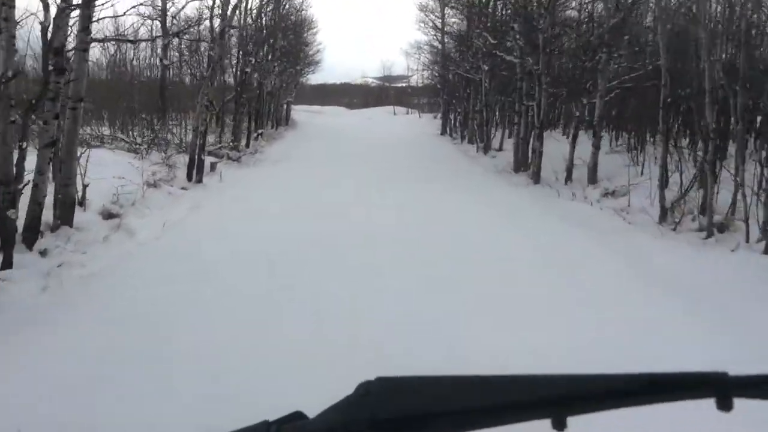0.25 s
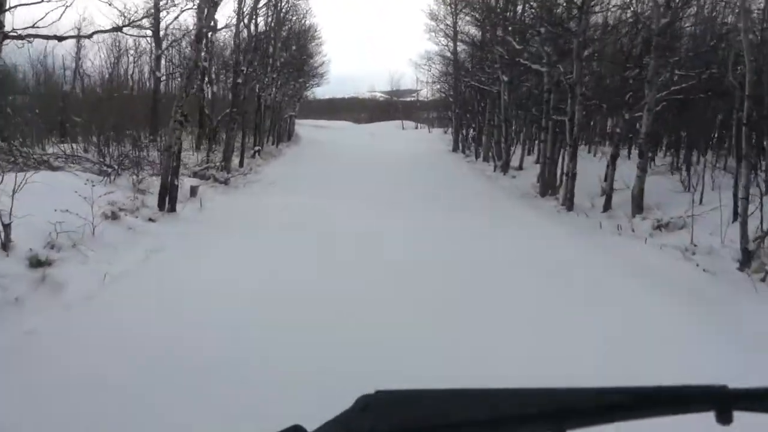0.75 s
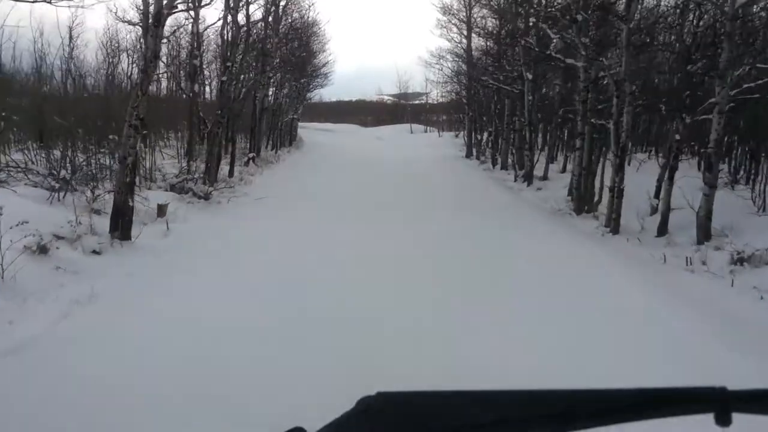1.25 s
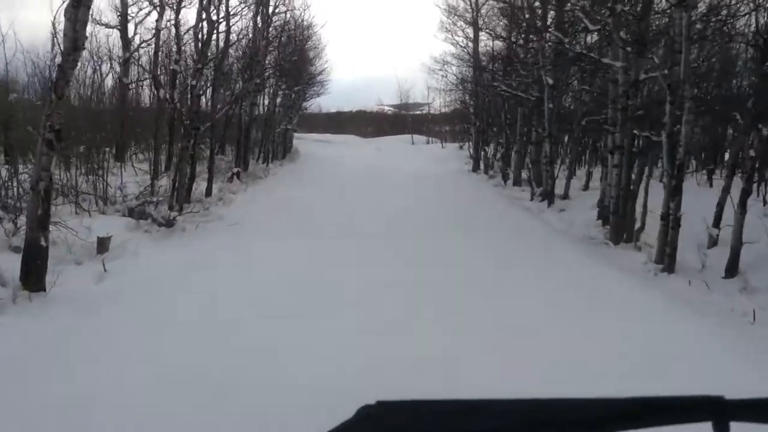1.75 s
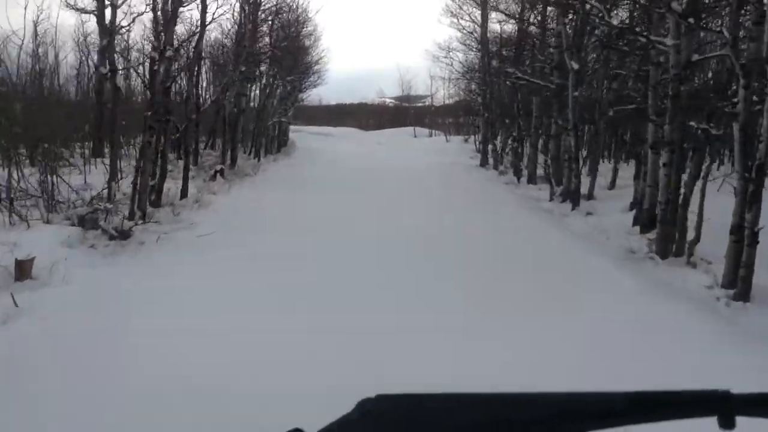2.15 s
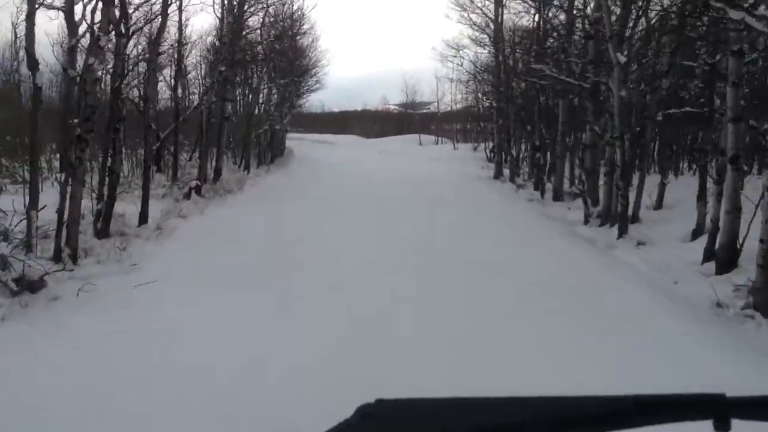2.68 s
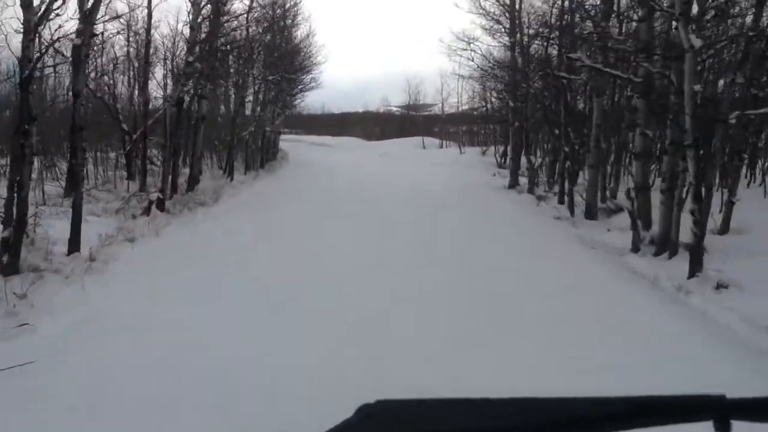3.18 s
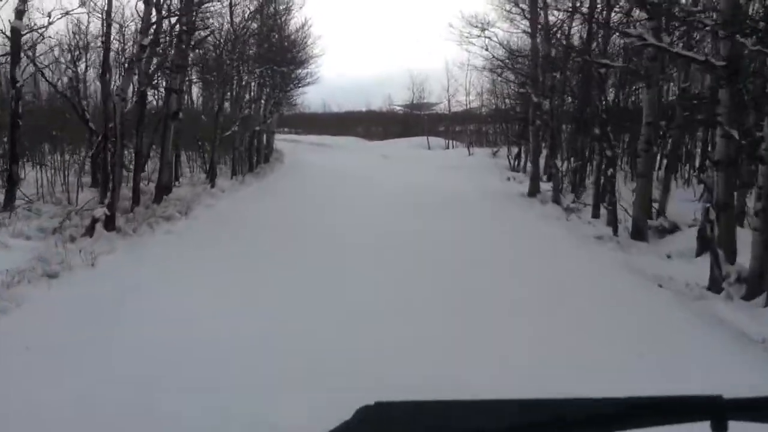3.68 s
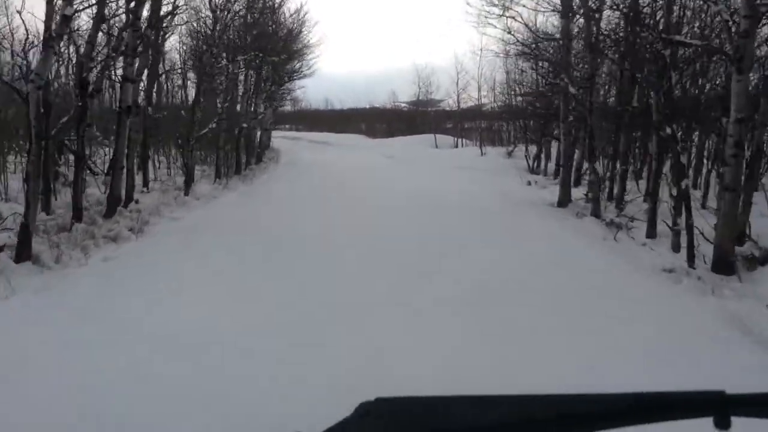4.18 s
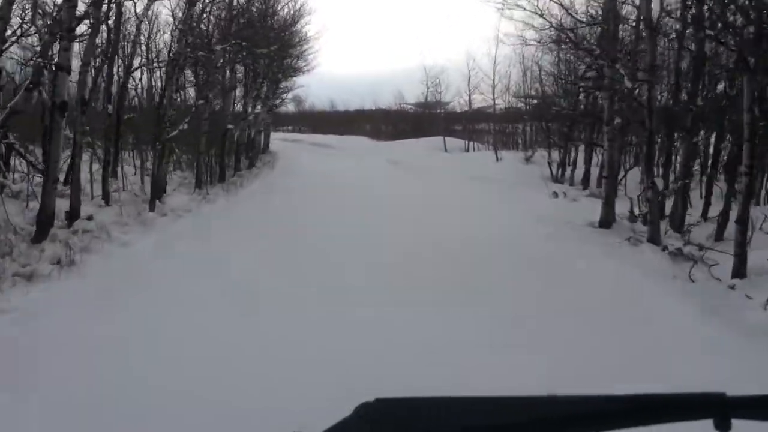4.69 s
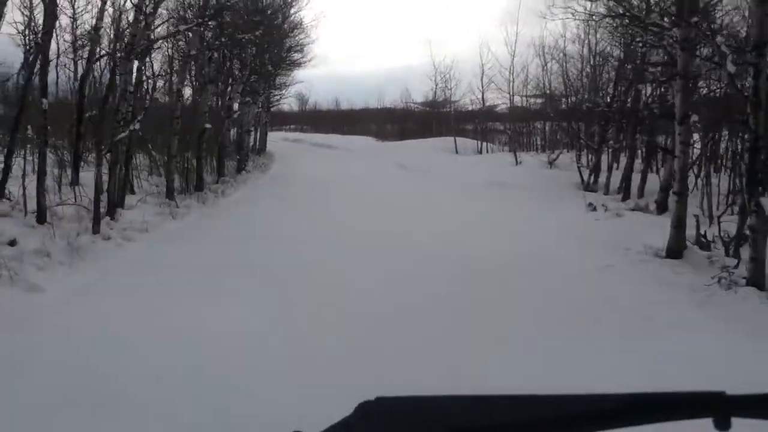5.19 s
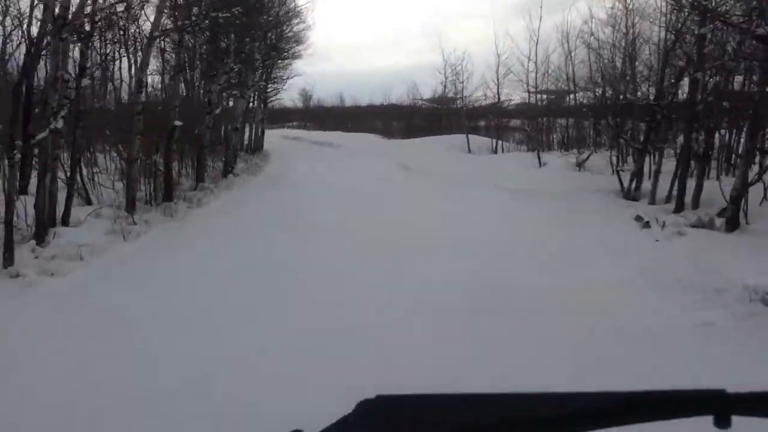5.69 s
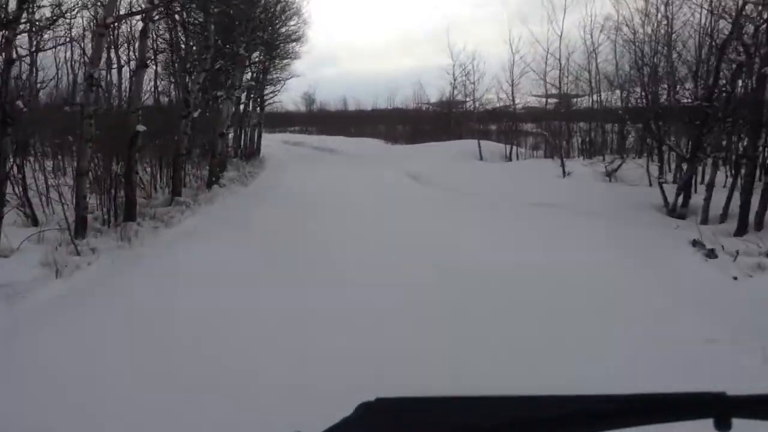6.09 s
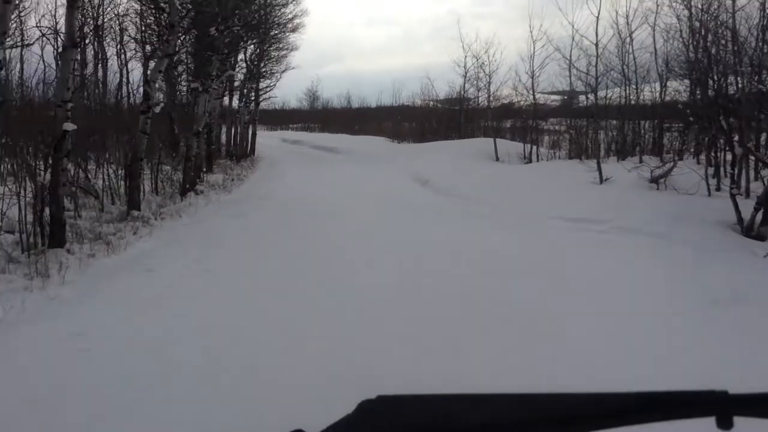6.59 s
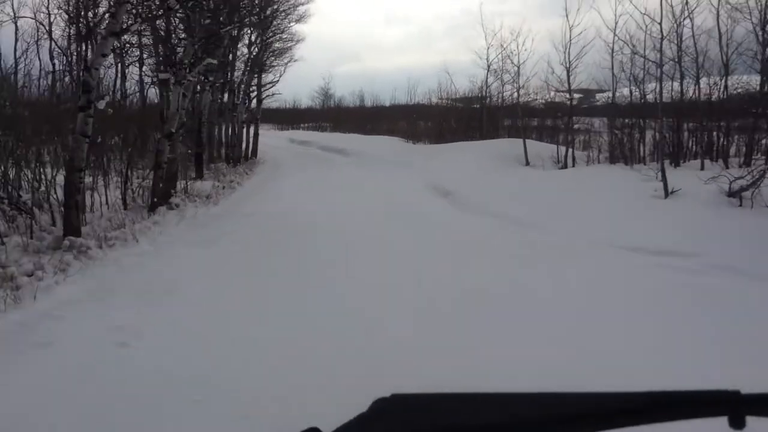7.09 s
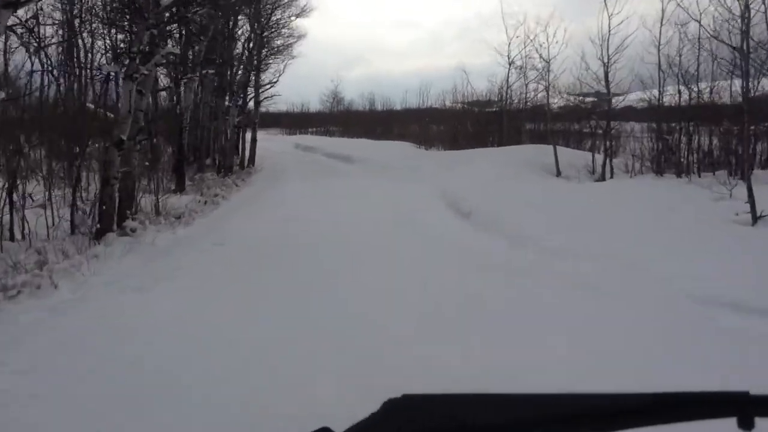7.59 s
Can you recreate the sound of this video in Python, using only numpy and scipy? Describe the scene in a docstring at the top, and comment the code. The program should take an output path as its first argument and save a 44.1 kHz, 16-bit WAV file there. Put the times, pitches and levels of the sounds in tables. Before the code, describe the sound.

A diesel truck drives slowly along a snowy track, heard from inside the cab. The engine gives a low, booming drone with a steady clatter on top. It thumps at low revs, rises slightly in pitch, then holds an even note. Underneath, the tyres rumble over humps of packed snow and loose fittings clunk lightly, mostly early on. A thin hiss and a very faint turbo whistle sit above.

```python
"""A four-cylinder diesel truck, heard from the cab, creeps along a snowy track; it gathers a little
speed, then holds it. The engine's low orders boom in the cab and its higher harmonics whine faintly.
Injectors, valves and knocks clatter in a pattern that repeats every two crank turns, and one cylinder
thumps at low revs. Underneath, the tyres rumble over humps of packed snow and loose fittings clunk
and tick. On top sit a faint turbo whistle and a thin hiss that pulses with the firings."""
import sys
import numpy as np
from scipy import signal
from scipy.fft import rfft, irfft
from scipy.io import wavfile
from scipy.ndimage import uniform_filter1d

SR = 44100
rng = np.random.default_rng(int(sys.argv[2]) if len(sys.argv) > 2 else 0)


def master(y):
    """Save y as 16-bit WAV."""
    cut = np.clip(np.atleast_2d(y).T, -1, 1)
    pcm = np.round(cut * 32767)  # scale
    wavfile.write(sys.argv[1], SR, pcm.astype(np.int16))


N = 346185
TIME = np.arange(N) / SR
FREQ = np.arange(N // 2 + 1) * SR / N + 1e-6


def undb(db):
    """Decibels to gain."""
    return 10 ** (np.asarray(db) / 20)


def unit(x):
    """Scale to rms 1."""
    return x / np.sqrt(np.mean(x ** 2))


def curves(table):
    """One automation curve for each value column of a time table."""
    times, *columns = np.transpose(table)
    return [np.interp(TIME, times, column) for column in columns]


def wander(rate_hz):
    """Smooth random modulation, rms 1."""
    return unit(irfft(rfft(rng.standard_normal(N)) * np.exp(-(FREQ / rate_hz) ** 2), N))


def colour(x, eq, resonances=()):
    """Shape a sound with an EQ curve and resonances standing on it; rms 1."""
    hz, db = np.transpose(eq)
    outline = undb(np.interp(np.log(FREQ), np.log(hz), db))
    rings = sum(undb(peak_db) / (1 + 2j * (FREQ - f) / width) for f, width, peak_db in resonances)
    return unit(irfft(rfft(x) * outline * (1 + rings), N))


def ring(hz, decay_s):
    """A struck part's muffled tone: it swells to a peak, then dies away."""
    age = TIME[:SR // 20]
    return np.sin(2 * np.pi * hz * age) * age / decay_s * np.exp(1 - age / decay_s)


def burst(decay_s):
    """The dense, short ring of a struck casting."""
    age = TIME[:SR // 20]
    return rng.standard_normal(len(age)) * np.exp(-age / decay_s)


def strikes(turns, angle, hit, scatter_db, jitter_s):
    """One hit per two-turn cycle at a crank angle (in turns), never quite alike in time or force."""
    starts = 2 * np.arange(int(turns[-1] / 2) + 1)
    late, force = rng.standard_normal((SR // 100, 2))[:len(starts)].T
    due_s = np.interp(starts + angle, turns, TIME, right=2 * TIME[-1])
    at = np.round((due_s + jitter_s * late) * SR).astype(int)
    inside = (at >= 0) & (at < N)
    blows = np.zeros(N)
    blows[at[inside]] = undb(scatter_db * force[inside])
    return signal.oaconvolve(blows, hit)[:N]


def firing_pulse(turns, depth):
    """A tremolo that swells with each injection, twice per crank turn."""
    return 1 - depth * np.cos(2 * np.pi * 2 * turns)


def orders(table, crank_hz, turns, waver, waver_hz, mount_turns=.955, exhaust_turns=1.27):
    """Tones driven by the crank, each swelling as the speed brings it onto a cab resonance."""
    out = 0
    for order, db, resonant_hz, width_hz in table:
        order = np.round(2 * order) / 2  # lock to the two-turn cycle
        # half orders arrive down the exhaust, whole ones through the mounts, which smear each firing
        arrival, smear = (exhaust_turns, 0) if order % 1 else (mount_turns, .22)
        phase = 2 * np.pi * order * (turns - arrival) - smear * order ** 2
        swell = 1 / np.hypot(1, (crank_hz - resonant_hz) / width_hz)
        level = undb(db) * swell * (1 + waver * wander(waver_hz))
        out = out + np.sqrt(2) * level * np.sin(phase)
    return out


def turbo():
    """The turbo's faint, breathy whistle drifts up in pitch, then sinks."""
    # path of the whistle: (time [s], pitch [Hz], level [dB])
    whistle = [(0, 7000, -72), (1, 7140, -74), (1.4, 7400, -78), (2.1, 7430, -71), (3.6, 7440, -74),
               (4.6, 7140, -75), (6.5, 6970, -74), (7.2, 6830, -72), (7.85, 6750, -69)]
    hz, db = curves(whistle)
    return np.sin(2 * np.pi * np.cumsum(hz) / SR) * wander(160) * undb(db)


def hiss(turns, crank_hz, brighten_per_hz=.034):
    """Thin, grainy engine-bay hiss that pulses with the firings and brightens with the revs."""
    # tone of the hiss: (frequency [Hz], gain [dB])
    hiss_eq = [(1500, -28), (3400, 9), (4200, 2), (5100, -1), (5600, 0), (6200, -2), (7100, 0), (8500, -4),
               (10200, -3.5), (10750, 0), (11300, -3.5), (12500, -4), (14500, -8), (15700, -7.5)]
    air = colour(rng.standard_normal(N) * undb(.8 * wander(1500)), hiss_eq)
    top = irfft(rfft(air) * np.clip((FREQ - 8000) / 3000, 0, 1), N)
    # the very top pulses most deeply, and differs from one cylinder to the next
    uneven = .1 * np.cos(np.pi * turns) + .1 * np.cos(2 * np.pi * turns)
    brighten = brighten_per_hz * (crank_hz - np.mean(crank_hz))
    air = air + top * (firing_pulse(turns, depth=.17) - 1 + uneven + brighten)
    flicker_db = .4 * wander(50) + .25 * wander(8)
    return air * firing_pulse(turns, depth=.15) * undb(flicker_db)


def ticks(decay_s=.0012, tail_s=.025, tail_db=-17, low_cut_hz=11000):
    """Something loose in the cab gives two tiny bright ticks, each with a faint tail."""
    # ticks ahead of the low cut: (time [s], level [dB])
    hits = [(5.515, -49), (5.525, -44)]
    envelope = 0
    for start, db in hits:
        age = np.abs(TIME - start)
        fade = np.exp(-age / decay_s) + undb(tail_db) * np.exp(-age / tail_s)
        envelope = envelope + undb(db) * (TIME >= start) * fade
    low_cut = signal.butter(4, low_cut_hz, "high", fs=SR, output="sos")
    return signal.sosfilt(low_cut, envelope * rng.standard_normal(N))


def clunks(decay_s=.007):
    """Loose fittings of the cab knock as the truck sways."""
    # knocks of the fittings: (time [s], peak [dB], pitch [Hz])
    hits = [(.25, -41, 562), (.597, -37, 565), (1.435, -37, 460), (1.524, -33, 584), (1.642, -42, 680),
            (1.936, -38, 590), (3.606, -45, 665), (3.873, -38, 730), (6.19, -43, 740), (6.372, -44, 705)]
    out = np.zeros(N + SR)
    for start, db, hz in hits:
        at = int(start * SR)
        blow = undb(db) * ring(hz, decay_s)
        out[at:at + len(blow)] += blow
    return out[:N]


def tyres(hump_s=.09, bump_db=1.06, bump_hz=14, crossover_hz=400):
    """Snow packs unevenly under the treads: the crunch follows each hump, the deep rumble only the trend."""
    # the track, from uneven to smoother snow: (time [s], level [dB])
    track = [(0, -36.5), (1.6, -37.5), (3, -38), (4.5, -37), (7.85, -37.5)]
    # humps of packed snow: (time [s], boost [dB])
    humps = [(.24, 3.5), (.58, 2.5), (1.3, 6.5), (1.56, 5), (1.92, 5.5), (2.19, 6), (3.05, 5.5),
             (3.59, 2.5)]
    # tone of the tyres in the cab: (frequency [Hz], gain [dB])
    road_eq = [(15, -25), (35, -11.5), (52, 2), (80, 3), (130, 1.5), (230, 4), (290, 2), (390, 1.5),
               (510, -6), (570, -7), (670, -10), (760, -16.5), (1200, -20), (4000, -53.5)]
    track_db, = curves(track)
    road_db = track_db + sum(db * np.exp(-((TIME - crest) / hump_s) ** 2) for crest, db in humps)
    rolling = colour(rng.standard_normal(N) * undb(bump_db * wander(bump_hz)), road_eq)
    crunch = irfft(rfft(rolling) / (1 + (crossover_hz / FREQ) ** 4), N)
    rumble = rolling - crunch
    return crunch * undb(road_db) + rumble * undb(uniform_filter1d(road_db, SR))


def whine(turns, crank_hz):
    """The engine's higher harmonics whine faintly, wavering as they pass through resonances."""
    # high engine tones:
    # (order [x crank speed], level on resonance [dB], resonant speed [Hz], half-width [Hz])
    tones = [(20, -58.5, 32, 1), (22.5, -55, 32.1, .5), (24, -56, 31.1, 0.32), (26, -53, 28.9, 0.32),
             (26.5, -58, 30.1, 0.43), (31.7, -60, 30.2, 0.55), (33.5, -62.5, 32, 0.67),
             (37.3, -68, 32.1, .5)]
    return orders(tones, crank_hz, turns, waver=.35, waver_hz=9)


def covers(turns):
    """The even beat of the injectors sets the thin engine covers singing."""
    # modes of the covers: (frequency [Hz], width [Hz], gain [dB])
    modes = [(1075, 46, 2.5), (1360, 45, -3), (1561, 52, 3), (1653.5, 59, 2), (2216, 71, -3),
             (2426, 58, -3.5), (2742, 45, -5.5), (2799, 36, -1), (2942, 69, -3), (3347, 46, -2)]
    beat = sum(strikes(turns, k / 2, np.ones(1), scatter_db=.7, jitter_s=.000015) for k in range(4))
    rings = sum(undb(db) / (1 + 2j * (FREQ - hz) / width) ** 2 for hz, width, db in modes)
    return unit(irfft(rfft(beat) * rings, N))


def clatter(turns, valve_hits=20, valve_s=.012, injector_s=.00085, injector_db=-11, loose=.55):
    """Valve gear ticks all round the cycle, four injectors snap half a turn apart, loose parts rattle."""
    # what the bulkhead lets through: (frequency [Hz], gain [dB])
    bulkhead_eq = [(200, -19), (350, 9.5), (460, 7.5), (540, -9), (680, 7), (770, 6.5), (920, 3.5),
                   (1100, 1), (1300, 2.6), (2000, 1.5), (2650, -1), (3250, -1), (3600, -14.5), (4200, -23),
                   (8000, -37)]
    # ringing of block and covers: (frequency [Hz], width [Hz], gain against the EQ curve [dB])
    block_modes = [(1075, 43, 7.5), (2424, 40, -2.5), (2800, 46, -1.5)]
    valves = injectors = 0
    for k in range(valve_hits):
        angle = 2 * (k + .5 * rng.random()) / valve_hits
        valves += strikes(turns, angle, burst(valve_s), scatter_db=1, jitter_s=.00004)
    for k in range(4):
        injectors += strikes(turns, (k + .5) / 2, burst(injector_s), scatter_db=.5, jitter_s=.00006)
    rattle = loose * rng.standard_normal(N) * firing_pulse(turns, depth=.07)
    return colour(unit(valves) + undb(injector_db) * unit(injectors) + rattle, bulkhead_eq, block_modes)


def knocks(turns, crank_hz, harden_db_per_hz=.5):
    """The diesel chug: uneven cylinders ring the block in every cycle, harder as the revs rise."""
    # knocks of one cycle: (crank angle [turns], pitch [Hz], decay [s], peak at top revs [dB])
    hits = [(.72, 785, .0026, -39.8), (.08, 740, .002, -46), (.52, 800, .002, -47),
            (1.63, 700, .002, -47.5), (.69, 1040, .002, -50), (1.28, 1100, .003, -45.5)]
    chug = sum(undb(db) * strikes(turns, angle, ring(hz, decay_s), scatter_db=1.8, jitter_s=.0002)
               for angle, hz, decay_s, db in hits)
    return chug * undb(harden_db_per_hz * (crank_hz - np.max(crank_hz)))


def thump(turns, crank_hz, pitch_hz=363, low_revs_db=-33.5, ease_db_per_hz=1.5):
    """One cylinder fires hard at low revs, easing as they rise; a few single firings jolt the cab."""
    # the hardest firings as the engine takes up the load: (time [s], peak [dB])
    hardest = [(1.229, -24), (1.3, -28), (1.439, -28)]
    thud = -ring(pitch_hz, decay_s=.0016)
    # two like blows in each cycle, the second about a fifth of a turn after the first
    blows = sum(strikes(turns, angle, thud, scatter_db=1.5, jitter_s=.0001) for angle in (.77, .98))
    kicks = np.zeros(N)
    for start, db in hardest:
        kicks[int(start * SR)] = undb(db)
    jolts = signal.oaconvolve(kicks, -ring(pitch_hz, decay_s=.001))[:N]
    return jolts + blows * undb(low_revs_db - ease_db_per_hz * (crank_hz - np.min(crank_hz)))


def firing_note(turns, arrival_turns=.32):
    """The engine's bass note: two firings to each crank turn."""
    # strength of the note in the cab: (time [s], level [dB])
    levels = [(0, -39.5), (1.09, -38), (1.68, -36.5), (3, -42.5), (4.5, -47), (5.8, -44), (7.06, -42),
              (7.85, -42.5)]
    db, = curves(levels)
    return undb(db) * unit(np.sin(2 * np.pi * 2 * (turns - arrival_turns)))


def boom(turns, crank_hz):
    """The engine's low orders drive the cab through the exhaust and the mounts."""
    # low tones: (order [x crank speed], level on resonance [dB], resonant speed [Hz], half-width [Hz])
    tones = [(3, -56, 31.8, 1.2), (4, -41.5, 28.4, 1.2), (4.5, -40, 30.74, 0.75), (5, -44, 29.2, 1.8),
             (6, -39, 32, 1), (6.5, -48.5, 32.2, 0.87), (7, -37.5, 31.34, 0.86), (7.5, -45, 27.5, 1.4),
             (8, -41.5, 31.9, 1.8), (8.5, -47, 31.9, 2.5), (9, -44, 27.7, 2.2), (9.5, -59, 31.8, 0.67),
             (10, -52.5, 34.3, 2.4), (11, -45, 31.9, 0.56), (11.5, -50, 31.8, 0.44), (12, -42, 31.7, 1.26),
             (12.5, -54, 31.8, 2.6), (13, -50, 30.6, 1.1), (13.5, -51, 31.4, 1.3), (14, -54, 30.7, 1.4),
             (15, -57, 32, 1.1)]
    return orders(tones, crank_hz, turns, waver=.05, waver_hz=5)


def scene(covers_db=-7.5, hiss_db=-59.5):
    """The crank sets the engine's pitch and rhythm; the tyres roll underneath. Mono."""
    # engine speed, hunting slightly two or three times a second: (time [s], crank speed [Hz])
    revs = [(0.0, 28.51), (0.3, 28.44), (0.75, 28.0), (0.99, 28.46), (1.2, 28.36), (1.35, 28.72),
            (1.47, 28.71), (1.77, 29.1), (2.49, 30.21), (2.7, 30.32), (2.85, 30.76), (3.03, 30.74),
            (3.36, 31.2), (3.54, 31.06), (3.72, 31.43), (4.05, 31.69), (4.2, 31.62), (4.32, 31.9),
            (4.5, 31.81), (4.71, 32.09), (5.13, 32.02), (5.31, 32.19), (5.55, 32.05), (5.73, 32.34),
            (5.91, 32.07), (6.12, 32.3), (6.33, 31.88), (6.57, 32.25), (6.78, 31.91), (7.02, 32.15),
            (7.2, 31.84), (7.47, 32.19), (7.65, 31.78), (7.85, 31.96)]
    # engine load, heard as the strength of the clatter: (time [s], level [dB])
    load = [(0, -47.5), (.8, -48), (1.5, -46.3), (3.7, -46.5), (5, -47.5), (7.85, -48.7)]
    crank_hz, = curves(revs)
    load_db, = curves(load)
    turns = np.cumsum(crank_hz) / SR
    drone = firing_note(turns) + boom(turns, crank_hz) + whine(turns, crank_hz)
    chug = knocks(turns, crank_hz) + thump(turns, crank_hz)
    top_end = undb(load_db) * (clatter(turns) + undb(covers_db) * covers(turns))
    air = undb(hiss_db) * hiss(turns, crank_hz) + turbo()
    return (drone + chug + top_end + air + tyres() + clunks() + ticks())[None]


def record(dry, top_hz=15750):
    """A steep low-pass shaves off the very top."""
    return signal.sosfilt(signal.ellip(12, .1, 80, top_hz, fs=SR, output="sos"), dry)


dry = scene()
out = record(dry)
master(out)
```